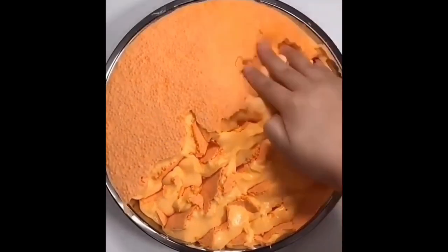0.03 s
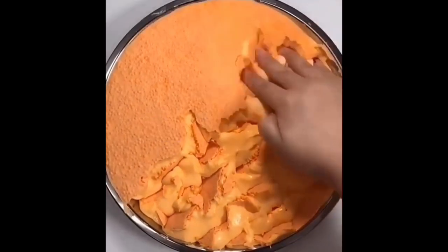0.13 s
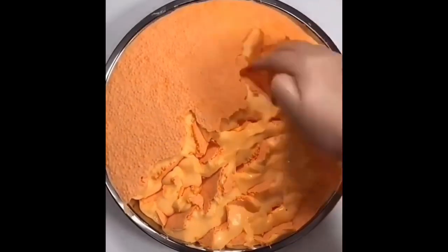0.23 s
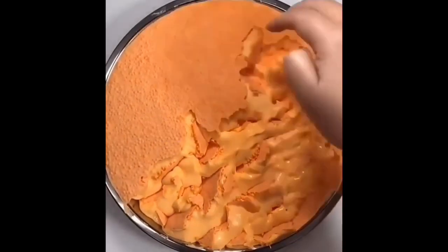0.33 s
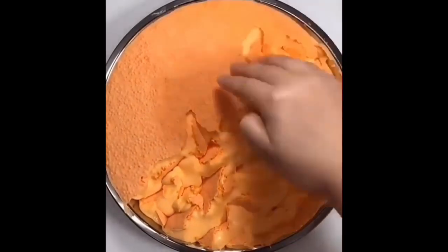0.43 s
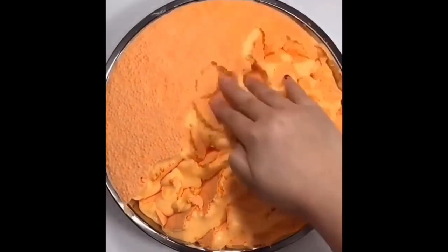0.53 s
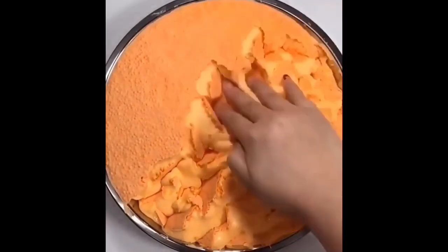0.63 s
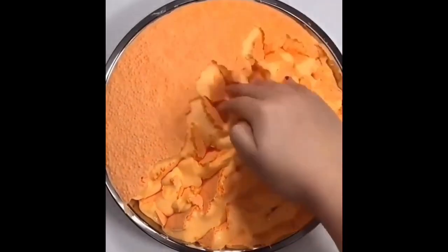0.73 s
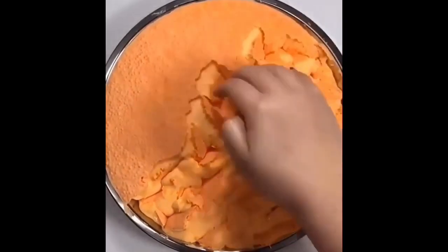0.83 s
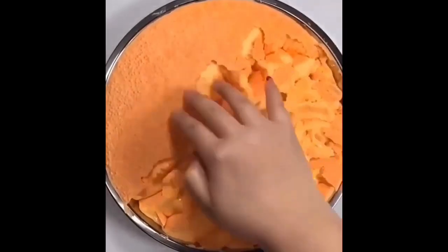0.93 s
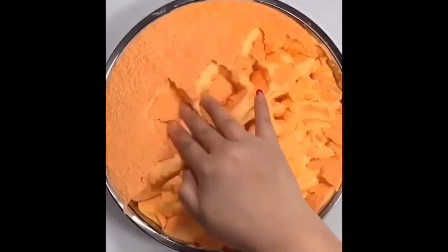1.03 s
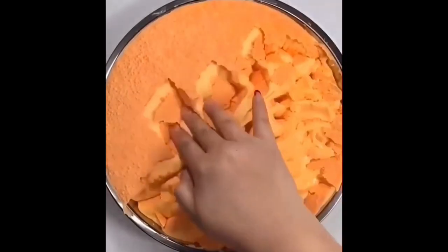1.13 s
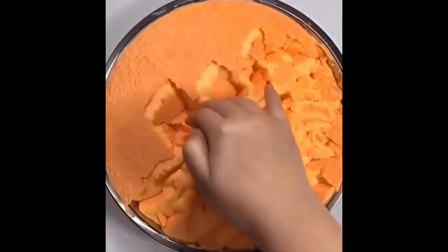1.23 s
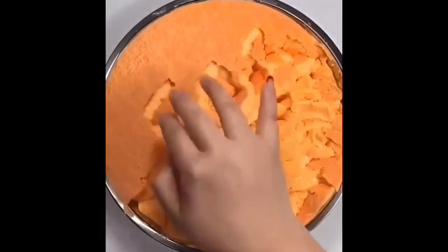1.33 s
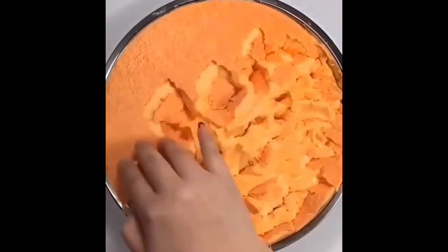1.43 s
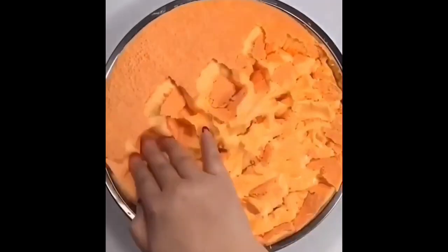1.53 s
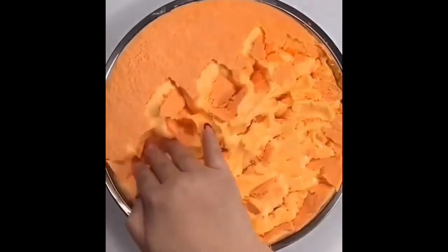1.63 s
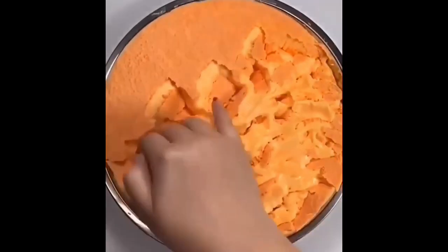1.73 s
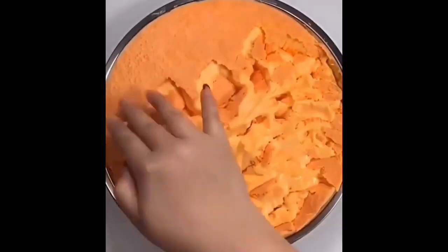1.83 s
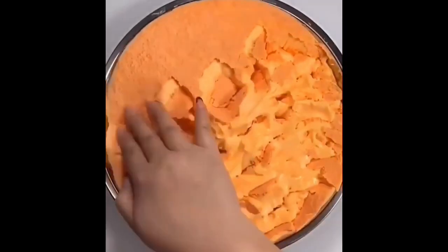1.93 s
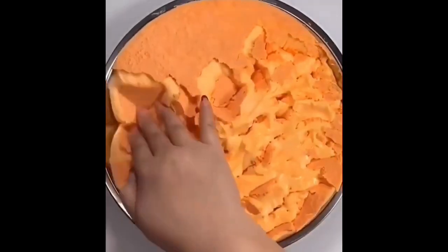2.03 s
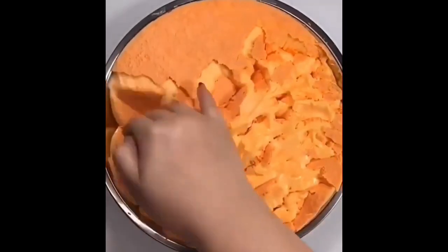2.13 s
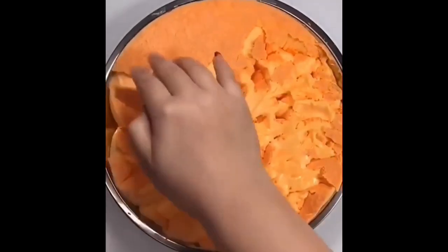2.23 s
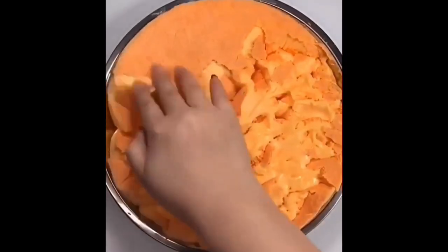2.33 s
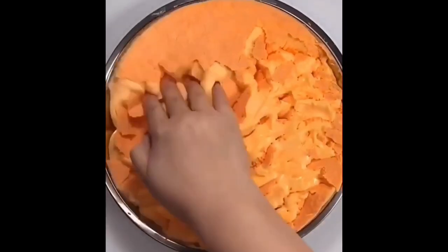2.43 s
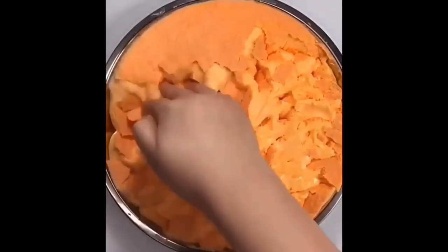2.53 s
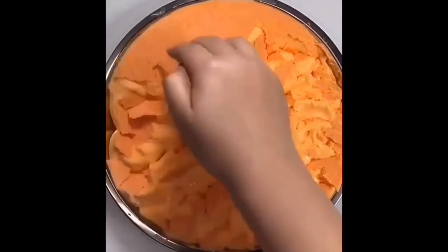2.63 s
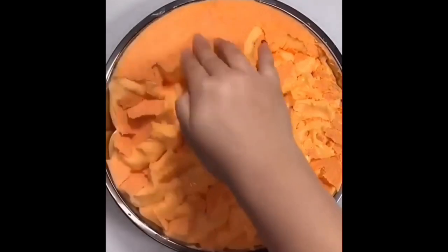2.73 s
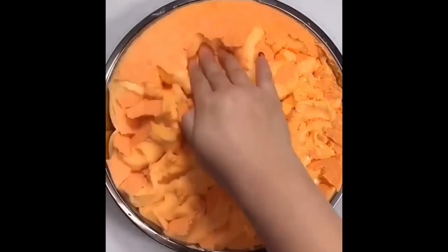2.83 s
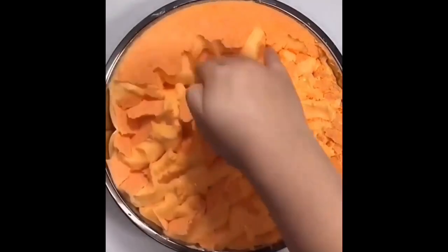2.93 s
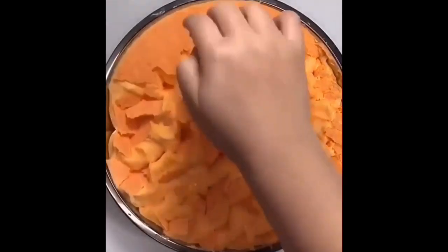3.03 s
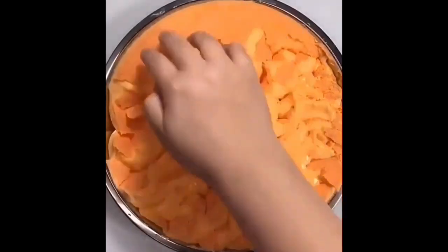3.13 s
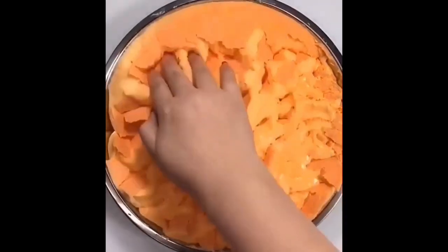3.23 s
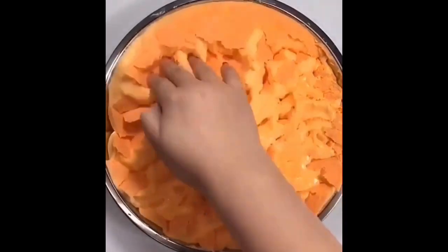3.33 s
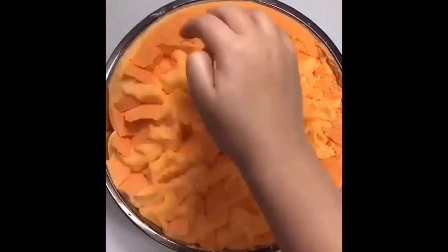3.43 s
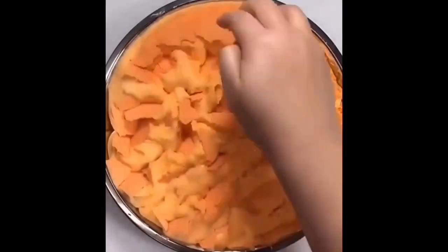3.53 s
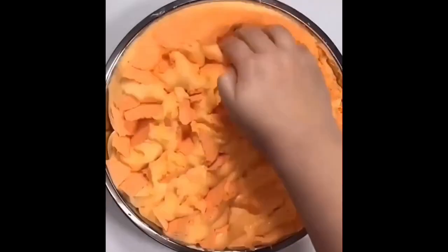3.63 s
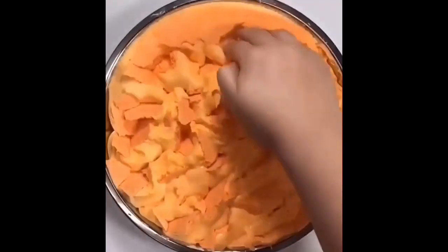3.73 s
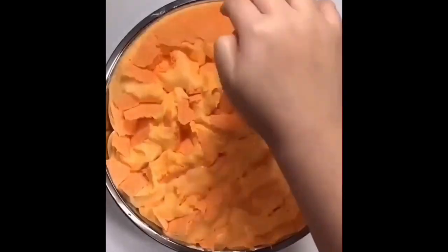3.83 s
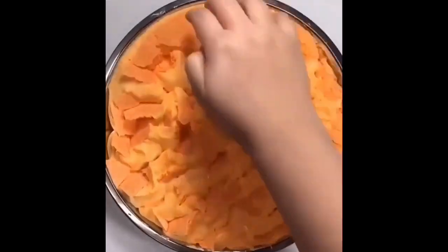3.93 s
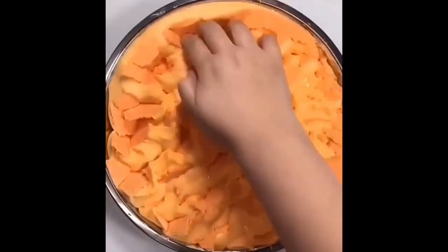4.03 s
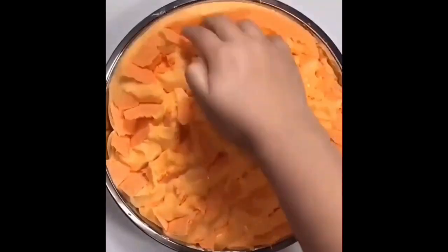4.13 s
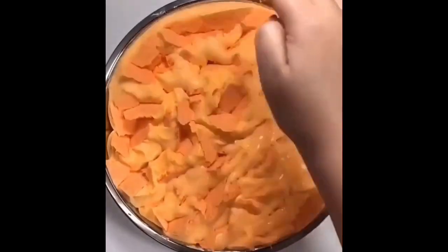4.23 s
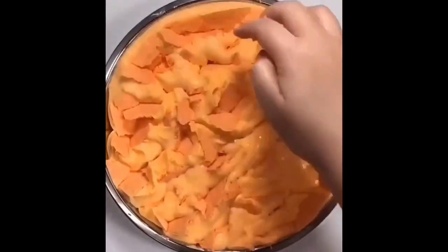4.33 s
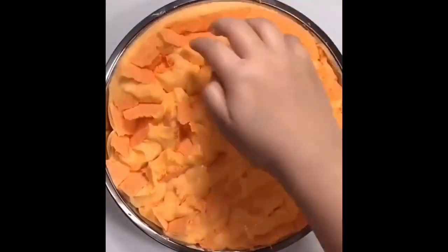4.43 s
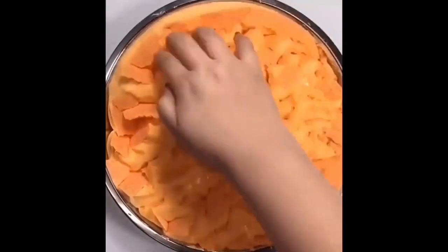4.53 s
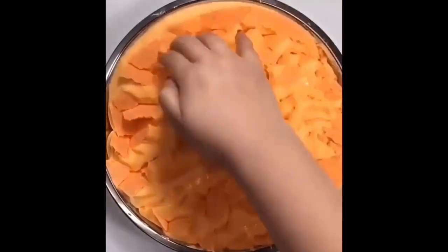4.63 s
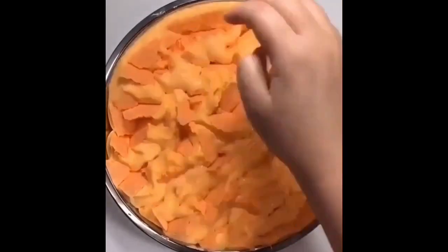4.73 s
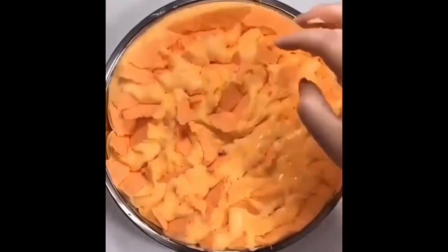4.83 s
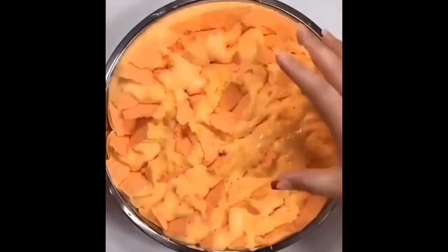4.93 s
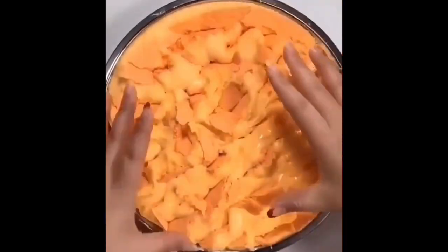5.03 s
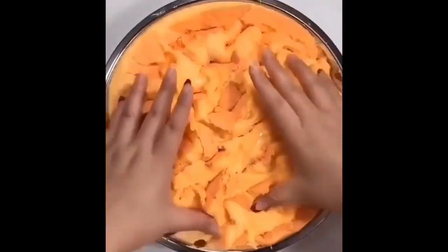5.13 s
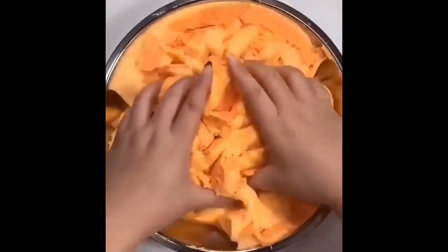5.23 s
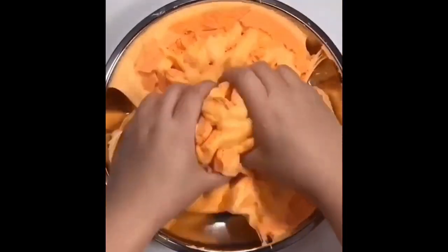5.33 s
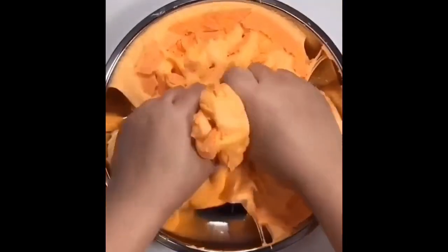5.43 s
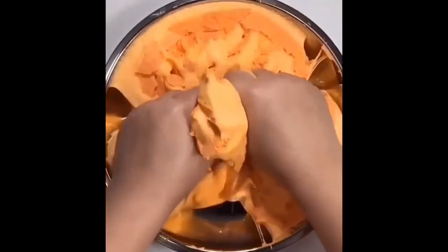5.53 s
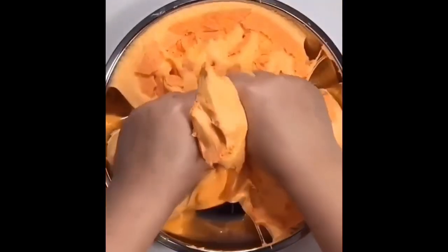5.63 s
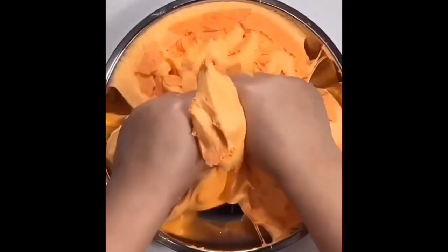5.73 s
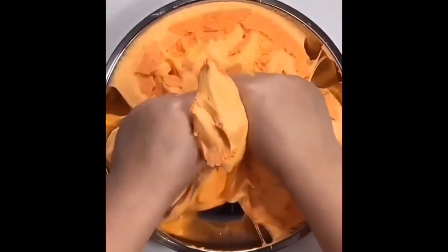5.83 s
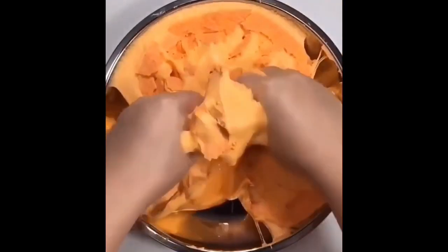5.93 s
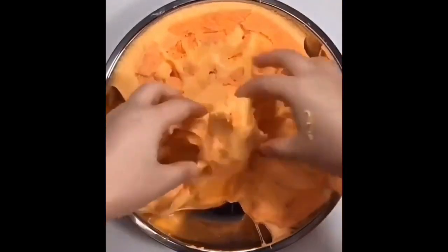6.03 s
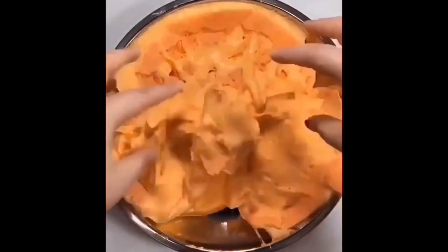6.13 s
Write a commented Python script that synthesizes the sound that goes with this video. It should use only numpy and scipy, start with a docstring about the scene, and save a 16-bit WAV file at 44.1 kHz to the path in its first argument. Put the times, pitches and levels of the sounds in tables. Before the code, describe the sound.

Fingers break the dry crust of slime in a metal bowl, very close to the microphone. From the start until about 5 seconds, short crisp crunches come unevenly, two or three a second. Each is a cluster of sharp cracks and small hollow plops over a dense fizz of tiny bursting bubbles, dying quickly, with a soft low bump from the pushed bowl. Strong crunches land around 0.7, 1.7, 2.1, 3.0 and 3.8 seconds, and deeper thumps come at about 3.9 and 4.2. After a crunch at 4.8 there is a brief lull. From 5.3 to about 5.9 seconds both hands gather the slime in a longer, softer crackle with scattered snaps and a few low plops of trapped air. A last crunch follows just after 6 seconds. The sound is fairly dry, and the quiet room has a faint steady hum.

```python
"""A quiet room with a faint hum, one microphone close to a metal bowl of slime with a dry crust.
Fingers press into it again and again, then both hands gather it up. Each press breaks the crust in
sharp cracks over a dense crackle of tiny bursting foam cells, and pushes the bowl, which thumps low.
Bowl and table throw back a short wash of reflections."""
import sys
import numpy as np
from scipy import signal
from scipy.fft import rfft, irfft
from scipy.io import wavfile
from scipy.ndimage import uniform_filter1d

SR = 44100
rng = np.random.default_rng(int(sys.argv[2]) if len(sys.argv) > 2 else 0)


def transcribe(signal):
    """Save signal, clipped to [-1, 1], as a 16-bit WAV file at the path in sys.argv[1]."""
    frames = np.atleast_2d(signal).T
    limited = np.clip(frames, -1, 1)
    pcm = np.round(limited * 32767).astype(np.int16)
    wavfile.write(sys.argv[1], SR, pcm)


N = 272229


def gain_of(db):
    """Turns dB into gain."""
    return 10 ** (np.asarray(db) / 20)


def unit_rms(x):
    """Scales to rms 1."""
    return x / np.sqrt(np.mean(x ** 2) + 1e-20)


def add(mix, start_s, sound):
    """Lays a sound into the mix."""
    part = mix[round(start_s * SR):][:len(sound)]
    part += sound[:len(part)]


def coloured(x, spectrum):
    """Equalises x along a curve drawn on a log-frequency axis; rms 1."""
    hz, db = np.transpose(spectrum)
    bin_hz = np.fft.rfftfreq(len(x), 1 / SR)
    curve = gain_of(np.interp(np.log(bin_hz + 1), np.log(hz + 1), db))
    return unit_rms(irfft(rfft(x) * curve, len(x)))


def resonate(x, hz, width_hz):
    """One resonance, with a gain near 1 at its centre."""
    radius = np.exp(-np.pi * width_hz / SR)
    pole = radius * np.exp(2j * np.pi * hz / SR)
    return 2 * signal.lfilter([1 - radius], [1, -pole], x + 0j).real


def resonate_twice(x, hz, width_hz):
    """The same resonance twice over, for steeper skirts."""
    return resonate(resonate(x, hz, width_hz), hz, width_hz)


def room_tone():
    """Steady rumble and hiss behind the bowl, with a slightly wavering hum."""
    # tones of the hum: f/Hz, width of the waver/Hz, level/dB
    hum_tones = [(48.3, 3, -57.5), (83.3, 6, -66.5)]
    # spectrum of the room's noise: f/Hz, relative level/dB
    spectrum = [(44, -31.5), (75, -7), (165, -3.5), (204, -14), (295, -15), (324, -11.5), (468, -20.5),
                (6310, -35.5), (7500, -40.5), (9750, -86.5), (16500, -120)]
    hum, t = np.zeros(N), np.arange(N) / SR
    for hz, width, db in hum_tones:
        waver = unit_rms(resonate(rng.standard_normal(N), hz, width))
        hum += gain_of(db) * unit_rms(np.sin(2 * np.pi * hz * t) + 0.14 * waver)
    return gain_of(-54) * coloured(rng.standard_normal(N), spectrum) + hum


def finger_strokes():
    """Each stroke sets in, holds and falls; gives the envelopes of crackle, hollow crust and bowl."""
    # pushes, rakes and squeezes: t/s, first touch re crackle/dB, rise/s, hold/s, crackle level/dB,
    # fall/(dB/s), hollow crust re crackle/dB, bowl level/dB, lag of the bowl/s
    strokes = [(0, 12, 0.0017, 0.0035, -55.5, 344, 12.5, -43, 0.0045),
               (0.128, -7.5, .033, 0.095, -31, 260, -3, -42, 0.018),
               (0.299, -7, 0.04, 0.0047, -38, 268, -20, -52.5, .03),
               (0.386, -10, 0.034, 0.0044, -34, 276, -10.5, -44, 0.016),
               (0.671, -7.5, 0.05, 0.0043, -28.5, 253, -1.5, -42.5, 0.027),
               (0.797, -5, 0.044, 0.082, -42, 270, -11.5, -56.5, .02),
               (0.914, 1, 0.035, 0.0055, -41, 267, -2, -41.5, 0.0036),
               (1.009, -12, 0.011, 0.004, -45, 383, -6, -52, .02),
               (1.154, 4, 0.028, 0.0045, -44, 300, -3, -42, .003),
               (1.181, -14.5, 0.029, 0.0038, -22, 345, -6, -39.5, 0.029),
               (1.333, -6, 0.0073, 0.0045, -27.5, 301, -13, -58, 0.018),
               (1.37, -17, 0.023, 0.0032, -34, 192, -5.5, -41.5, 0.011),
               (1.634, -10, 0.015, 0.0085, -38, 294, 4.5, -35.5, 0.016),
               (1.675, -12, 0.0084, .005, -26.5, 450, -6.5, -38, 0.03),
               (1.708, -8, .01, 0.017, -37, 69, -26, -55, 0.042),
               (1.847, -7, .032, 0.0058, -43, 207, -7, -43.5, .01),
               (1.984, -6, 0.011, 0.0074, -67.5, 300, 12, -61, .01),
               (2.072, -15, 0.078, 0.003, -29.5, 188, -9.5, -31.5, 0.015),
               (2.274, -25, 0.03, 0.0023, -27.5, 498, -15, -45.5, 0.029),
               (2.384, -11, 0.018, .003, -43, 904, -19, -70, .02),
               (2.503, -14, 0.0039, 0.0033, -36, 303, 7.5, -42, 0.017),
               (2.528, -10, 0.023, 0.0054, -24, 257, -10, -45, 0.037),
               (2.691, -13.5, 0.033, 0.042, -38, 247, -5.5, -46, 0.029),
               (2.922, -24, 0.035, 0.013, -27.5, 186, -3.5, -33, 0.031),
               (3.086, -13.5, 0.032, 0.0055, -34, 360, -10, -40, 0.019),
               (3.178, -5, .021, .003, -44.5, 306, -7, -53.5, .01),
               (3.363, -1, .02, 0.036, -28, 300, -9.5, -33, 0.013),
               (3.525, -7, 0.007, 0.0055, -36, 146, -9.5, -42, 0.054),
               (3.794, -4.5, 0.035, 0.0046, -27, 400, -4.5, -29, 0.023),
               (3.897, -11, .043, 0.0071, -37.5, 300, -4, -42, 0.027),
               (4.178, 0.5, 0.016, 0.037, -32, 407, -4.5, -37, 0.022),
               (4.287, -20, 0.018, 0.004, -35, 466, -12.5, -44, 0.034),
               (4.36, 0, .015, 0.015, -60.5, 150, -2.5, -69, .01),
               (4.734, -11, 0.023, .003, -24, 907, -7.5, -31, 0.0086),
               (4.782, -18, 0.034, 0.0025, -36, 304, -12, -41, 0.031),
               (5.237, -7, 0.0031, 0.0041, -45, 150, -11, -69, .02),
               (5.28, -10, 0.062, .02, -34, 153, -6, -49, 0.024),
               (5.376, -3, 0.041, .01, -33.5, 80, -3, -41, 0.089),
               (5.463, -4, 0.028, 0.26, -36, 74, -9, -51.5, 0.054),
               (5.844, -15, 0.01, 0.0039, -46.5, 220, -2, -64, .02),
               (5.92, -10, 0.023, .003, -51, 501, 6.5, -66, .02),
               (6.052, -3, 0.0032, 0.0044, -43.5, 165.5, -4, -51, 0.019),
               (6.084, -8, .046, 0.047, -34, 196, -0.5, -38.5, 0.023)]
    start, touch_db, rise, hold, db, fall, hollow_db, bowl_db, lag = np.transpose(strokes)[:, :, None]
    bowl_rise_db_per_s, bowl_fall_db_per_s = 452.5, 298.5
    sample_t = np.arange(N) / SR
    t = sample_t[::32]
    rise = np.maximum(rise, .002)
    rise_left = np.clip(1 - (t - start) / rise, 0, 1)
    swell = np.where(t < start, 0, gain_of(db + touch_db * rise_left))
    released_s = np.maximum(t - start - rise - hold, 0)
    settling = gain_of(-32.5 - 92 * released_s)  # the torn foam goes on settling
    level = swell * (gain_of(-fall * released_s) + settling)
    hollow = swell * (gain_of(hollow_db - 1.41 * fall * released_s) + settling)  # dies faster
    loading_db = bowl_rise_db_per_s * np.maximum(start + rise + lag - t, 0)
    unloading_db = bowl_fall_db_per_s * np.maximum(released_s - lag, 0)
    load = gain_of(bowl_db - loading_db - unloading_db)
    load *= np.clip((t - start) / 0.0049, 0, 1)  # silent before the touch
    # overlapping strokes add in power
    return [np.interp(sample_t, t, np.linalg.norm(x, axis=0)) for x in (level, hollow, load)]


def foam_cells(per_s, cycles, pitches, spread_db=3.5):
    """Cells burst at random, a few loudly; each rings briefly at a pitch set by its size."""
    strength = gain_of(spread_db * np.minimum(rng.exponential(1, N), 4))
    bursts = strength * (rng.random(N) < per_s / SR) * rng.choice([-1, 1], N)
    size_class, out = rng.integers(0, pitches, N), np.zeros(N)
    for k, hz in enumerate(np.geomspace(500, 7500, pitches)):
        radius = np.exp(-hz / cycles / SR)
        feedback = [1, -2 * radius * np.cos(2 * np.pi * hz / SR), radius ** 2]
        ring = signal.lfilter([1], feedback, bursts * (size_class == k))
        out += np.sqrt(hz) * unit_rms(ring)
    return unit_rms(out)


def crackle(level, hollow_level):
    """The foam's fine fizz and sharp ticks reach the microphone directly and through the hollow crust."""
    # brittle crust gives way to soft inner foam: t/s, ticks' share of the power/(0-1)
    brittleness = [(5.2, .35), (5.3, .15), (5.56, .07), (5.84, .07), (5.9, .15)]
    # resonances of the hollow crust: f/Hz, width/Hz, relative level/dB
    crust_modes = [(610, 330, 12), (860, 175, 5), (1150, 770, 10)]
    # colour of the direct crackle: f/Hz, relative level/dB
    spectrum = [(710, -21.5), (1200, -9.5), (1690, -7), (1830, -5), (4380, -9.5), (5820, -10.5),
                (6630, -12), (7500, -16), (9750, -57), (16500, -120)]
    tick_share = np.interp(np.arange(N) / SR, *np.transpose(brittleness))
    fizz = foam_cells(per_s=7000, cycles=4, pitches=20)
    ticks = foam_cells(per_s=1200, cycles=.8, pitches=12)
    foam = np.sqrt(1 - tick_share) * fizz + np.sqrt(tick_share) * ticks
    hollow = sum(gain_of(db) * unit_rms(resonate_twice(foam, hz, width)) for hz, width, db in crust_modes)
    return level * coloured(foam, spectrum) + hollow_level * unit_rms(hollow)


def bowl(load, mode_hz=151.2):
    """The pushed bowl swings in its lowest mode, its pitch wavering with the grip, and rumbles around it."""
    # the bowl's broader swings: f/Hz, width/Hz, level re the mode/dB
    swings = [(110, 56, -6), (199, 98, -7.5), (295.5, 37, -12)]
    grip = unit_rms(uniform_filter1d(uniform_filter1d(rng.standard_normal(N), 900), 900))
    mode = np.sqrt(2) * np.sin(2 * np.pi * np.cumsum(mode_hz * (1 + .02 * grip)) / SR)
    rumble = sum(gain_of(db) * unit_rms(resonate_twice(rng.standard_normal(N), hz, width))
                 for hz, width, db in swings)
    return load * (mode + rumble)


def small_plates(level, per_s=30, spread_db=6):
    """Lesser plates of crust break at random, as hard as the fingers then work; rows for cracks()."""
    when, plop_pitch, ring_pitch, weakness, plop_weakness, length = rng.random((N * per_s // SR, 6)).T
    db = 20 * np.log10(level[(when * N).astype(int)] + 1e-9) - spread_db * weakness
    plop_hz = np.interp(plop_pitch, (0, 1), (600, 1500))
    ring_hz = np.interp(ring_pitch, (0, 1), (1600, 4800))
    plop_db, ring_db = db + 10 - spread_db * plop_weakness, db + 7.5
    t60 = np.interp(length, (0, 1), (.008, .06))
    return list(zip(when * N / SR, plop_hz, plop_db, ring_hz, ring_db, t60))


def cracks(level, rise_s=.002):
    """Splinters build up to a main fracture and die away: a hollow plop, a bright ring and a dry snap."""
    # the loudest plates of crust to break: t/s, plop f/Hz, plop peak/dB, ring f/Hz, ring peak/dB, t60/s
    large_plates = [(.134, 590, -35, 6370, -17, 0.051), (.147, 1140, -22.5, 5170, -17, 0.049),
                    (.159, 670, -24, 2110, -10, 0.059), (.197, 620, -20, 1880, -13.5, 0.062),
                    (.211, 580, -23, 3590, -14, 0.069), (.233, 1300, -21, 1800, -11, 0.051),
                    (.245, 1500, -29, 5820, -9, 0.03), (.254, 1240, -32, 1530, -16, .035),
                    (.323, 860, -36, 3000, -17.5, 0.0093), (.338, 1500, -33, 6320, -12, 0.0082),
                    (.346, 710, -39, 4360, -16, 0.12), (.384, 1360, -27, 3520, -20, 0.064),
                    (.398, 1340, -35, 2640, -18, 0.017), (.426, 1260, -40, 2880, -10, 0.028),
                    (.467, 1370, -16, 1520, -20.5, 0.019), (.677, 1080, -14, 1800, -11.5, 0.0044),
                    (.72, 1290, -22.5, 3140, -9, .075), (.728, 1400, -15, 1600, -5.5, 0.036),
                    (.753, 1290, -41, 2710, -16.5, 0.13), (.763, 1390, -36, 3130, -25, .007),
                    (.807, 1370, -46.5, 3080, -16, .004), (.829, 1440, -45, 3450, -18.5, .011),
                    (.842, 1530, -40, 2550, -8.5, .023), (.879, 1500, -40, 3300, -11.5, 0.0058),
                    (.943, 1040, -24.5, 2440, -14.5, 0.025), (1.161, 540, -19, 1830, -14, 0.044),
                    (1.199, 570, -22, 5020, -11.5, 0.036), (1.228, 1110, -27, 1990, -26, 0.048),
                    (1.256, 990, -43, 3810, -15.5, .005), (1.313, 1160, -35, 4500, -16, 0.047),
                    (1.337, 1040, -32, 5280, -14.5, 0.0055), (1.343, 1150, -25, 1560, -5.5, 0.0072),
                    (1.376, 1100, -31, 4970, -18, 0.042), (1.396, 1120, -39, 3220, -14.5, 0.027),
                    (1.435, 1140, -26, 2050, -44, 0.025), (1.478, 1130, -34, 2530, -28.5, .049),
                    (1.776, 1500, -48, 3340, -20, 0.012), (1.801, 1500, -51, 3490, -22, 0.0071),
                    (1.822, 1500, -51, 3460, -20, 0.06), (1.839, 1500, -54, 3250, -29, .006),
                    (2.192, 1010, -41, 3930, -18, 0.19), (2.238, 1060, -46, 2340, -20.5, 0.021),
                    (2.607, 647, -49, 2110, -29, 0.044), (3.047, 1490, -48, 5600, -23, .016),
                    (3.053, 1410, -50, 5500, -22, .006), (4.788, 1010, -26, 2100, -36, .011),
                    (5.69, 1230, -32, 5880, -21, 0.038), (1.634, 533, -21, 3410, -15.5, 0.035),
                    (1.654, 1100, -17.5, 3430, -8.5, 0.021), (1.682, 860, -14.5, 2330, -3, 0.023),
                    (1.692, 1520, -29, 2050, -12.5, .011), (1.724, 816, -21.5, 3430, -8.5, 0.025),
                    (1.74, 1110, -43, 3500, -18, 0.031), (1.86, 950, -35, 2160, -19.5, 0.13),
                    (1.872, 1270, -32, 2500, -9.5, 0.092), (1.887, 1500, -25.5, 3160, -15.5, 0.025),
                    (2.075, 610, -23, 2370, -20, 0.057), (2.082, 640, -22, 3760, -15, 0.02),
                    (2.111, 814, -10.5, 4520, -8, 0.024), (2.116, 860, -18, 2680, -5.5, .042),
                    (2.155, 574, -23, 2300, -11, 0.069), (2.283, 960, -30, 1990, -20, 0.061),
                    (2.298, 1290, -28, 3490, -22, 0.077), (2.311, 1090, -22, 2390, -9, 0.029),
                    (2.349, 760, -27.5, 1580, -19.5, .015), (2.404, 1010, -34.5, 2670, -24, .015),
                    (2.505, 570, -22, 1780, -19, .024), (2.536, 1390, -36, 3520, -12, .094),
                    (2.543, 585, -20, 5600, -11, 0.025), (2.55, 1110, -18, 5440, -10, 0.061),
                    (2.572, 1500, -32, 3500, -17, 0.026), (2.736, 1040, -20, 2690, -37, 0.033),
                    (2.758, 1150, -25.5, 1550, -41, 0.1), (2.921, 1150, -21.5, 5160, -20.5, 0.051),
                    (2.925, 654, -19.5, 1510, -26, 0.018), (2.959, 1400, -20, 1510, -7.5, 0.12),
                    (2.979, 670, -14, 3250, -9, 0.023), (3.007, 1500, -44, 2120, -16.5, 0.025),
                    (3.113, 1420, -42, 3310, -19, 0.036), (3.12, 1410, -35, 5560, -14, 0.041),
                    (3.136, 1460, -24, 1510, -31, .006), (3.365, 705, -21.5, 3540, -33, 0.28),
                    (3.386, 1100, -22, 2980, -11.5, 0.055), (3.433, 1130, -29, 3220, -12.5, .015),
                    (3.541, 1470, -43, 2770, -13, 0.043), (3.58, 1080, -29.5, 1790, -28, 0.018),
                    (3.794, 650, -22, 3900, -21, .13), (3.802, 1260, -16.5, 3840, -12.5, 0.13),
                    (3.847, 840, -16.5, 2190, -16, 0.039), (3.962, 980, -46, 2210, -23, 0.035),
                    (4.179, 810, -15.5, 1520, -24.5, 0.014), (4.191, 1480, -16.5, 1510, -14.5, 0.074),
                    (4.201, 1500, -30, 1540, -12.5, .039), (4.24, 1000, -30, 1770, -14.5, 0.072),
                    (4.308, 1090, -29, 2070, -23.5, 0.14), (4.735, 890, -17, 1510, -35, 0.0083),
                    (4.753, 1100, -17, 3010, -8.5, 0.058), (4.824, 980, -25, 3280, -13.5, 0.035),
                    (5.242, 1180, -33.5, 2770, -33, 0.04), (5.282, 950, -28, 2530, -26, 0.12),
                    (5.342, 580, -22, 2070, -16, .078), (5.374, 800, -26, 2030, -16, .05),
                    (5.384, 1000, -28, 2150, -12, 0.16), (5.407, 550, -22.5, 1860, -7, 0.077),
                    (5.434, 850, -16, 1510, -18, 0.0074), (5.447, 805, -21, 3700, -9, 0.047),
                    (5.531, 1250, -21, 2360, -11, 0.04), (5.545, 503, -30, 1840, -12, 0.024),
                    (5.726, 1230, -21, 1800, -36, .041), (5.745, 1470, -24.5, 1510, -30, 0.093),
                    (5.847, 1540, -23, 2530, -7.5, 0.037), (5.926, 1400, -14.5, 1920, -32, 0.025),
                    (6.057, 550, -33, 2850, -29, 0.037), (6.084, 430, -27, 2250, -38, .015),
                    (6.097, 680, -24.5, 2480, -15.5, 0.043), (6.129, 1500, -24.5, 1510, -13.5, 0.046),
                    (6.165, 1160, -17, 1780, -33, 0.041)]
    out, t = np.zeros(N), np.arange(2000) / SR
    snap_band = signal.butter(2, [1200, 6500], "band", fs=SR, output="sos")
    for start_s, plop_hz, plop_db, ring_hz, ring_db, t60 in large_plates + small_plates(level):
        splinters = rng.standard_normal(len(t))
        build_up = np.minimum(t / rise_s, 1) ** 1.22
        burst = splinters * build_up * gain_of(-60 * np.maximum(t - rise_s, 0) / t60)
        burst[round(rise_s * SR)] += 10.7 * np.sign(splinters[0])  # the main fracture
        plop = resonate_twice(burst, plop_hz, width_hz=0.73 * plop_hz)
        ring = resonate(burst, ring_hz, width_hz=.24 * ring_hz)
        bright = ring + .5 * signal.sosfilt(snap_band, burst)
        add(out, start_s, gain_of(plop_db) * plop / abs(plop).max())
        add(out, start_s, gain_of(ring_db) * bright / abs(bright).max())
    return out


def reflections(x, t60=0.08):
    """A short wash off the bowl and table, 3 ms behind the direct sound."""
    t = np.arange(SR // 4) / SR
    tail = rng.standard_normal(len(t)) * gain_of(-60 * t / t60) * (t > .003)
    return signal.oaconvolve(x, tail / np.linalg.norm(tail))[:N]


def thumps(attack_s=0.00092):
    """Fingertips reach the bottom, or trapped air plops: a short, low, damped swing."""
    # pushes to the bottom of the bowl: t/s, peak level/dB, f/Hz, t60/s
    deep_pushes = [(0.732, -33.5, 127, 0.032), (3.852, -18, 170, 0.019), (4.186, -23.5, 127, 0.016),
                   (5.304, -33, 121, 0.097), (5.448, -25, 220, 0.052), (5.584, -22, 283, 0.046),
                   (6.092, -30, 334, 0.12)]
    out, t = np.zeros(N), np.arange(12000) / SR
    attack = 1 - np.exp(-t / attack_s)
    for start_s, db, hz, t60 in deep_pushes:
        swing = np.sin(2 * np.pi * hz * t) * attack * gain_of(-60 * t / t60)
        add(out, start_s, gain_of(db) * swing / abs(swing).max())
    return out


def scene():
    """Slime and bowl close up, room tone behind, in mono."""
    level, hollow_level, load = finger_strokes()
    slime = crackle(level, hollow_level) + cracks(level)
    return (slime + gain_of(-13.0) * reflections(slime) + bowl(load) + thumps() + room_tone())[None]


def record(dry):
    """The microphone cuts the deep bass and rolls off the treble steeply; a band limit follows."""
    low_cut = signal.butter(6, 41, "high", fs=SR, output="sos")
    roll_off = signal.firwin(121, 7100, window=("kaiser", 6.5), fs=SR)
    band_limit = signal.firwin(121, 8200, window=("kaiser", 5), fs=SR)
    picked_up = signal.oaconvolve(signal.sosfilt(low_cut, dry), roll_off[None], "same")
    return signal.oaconvolve(picked_up, band_limit[None], "same")


dry = scene()
out = record(dry)
transcribe(out)
```